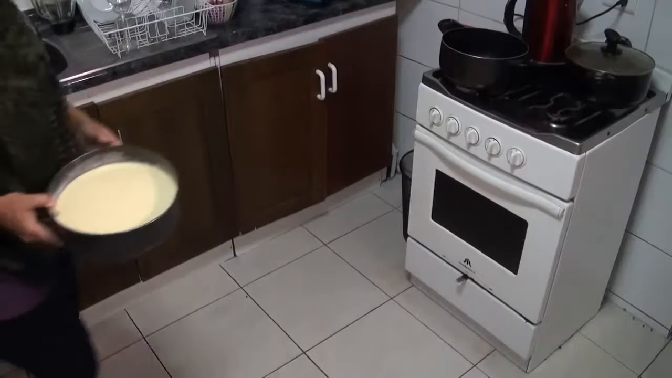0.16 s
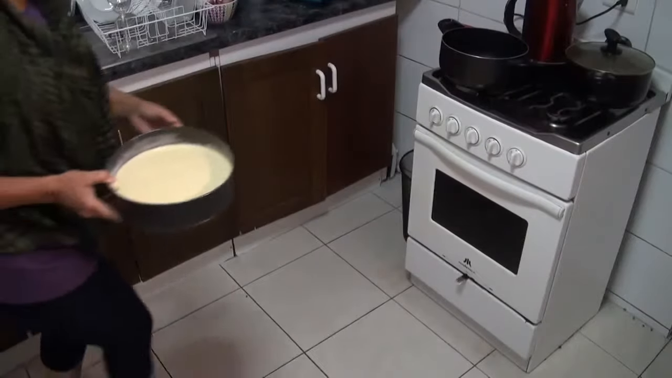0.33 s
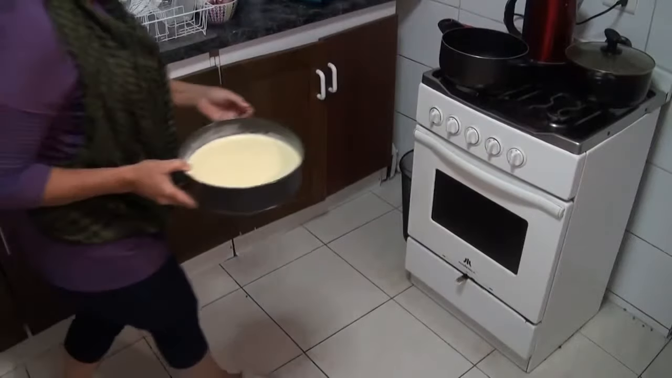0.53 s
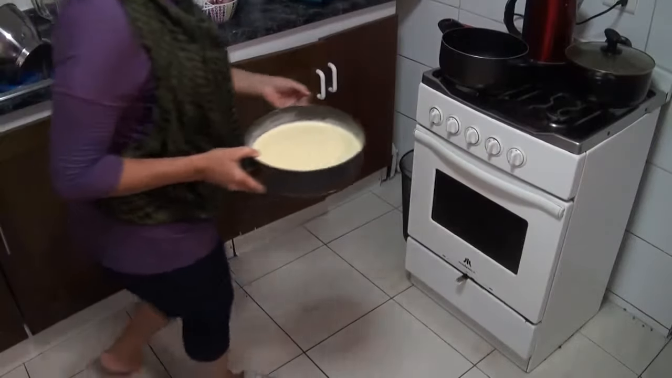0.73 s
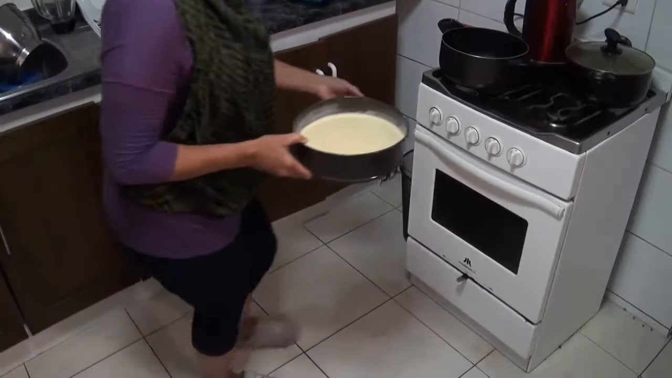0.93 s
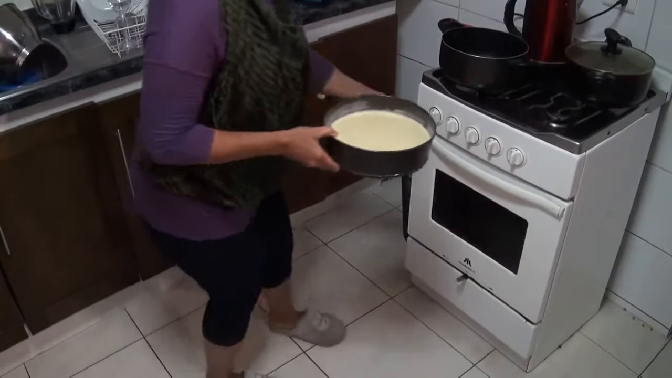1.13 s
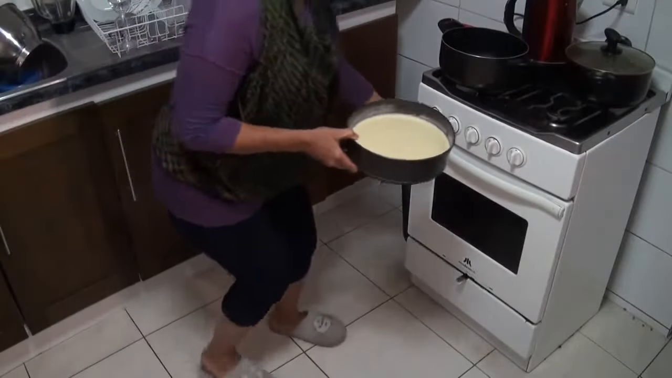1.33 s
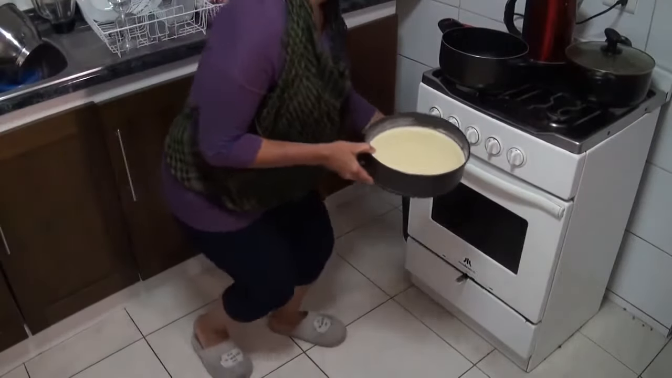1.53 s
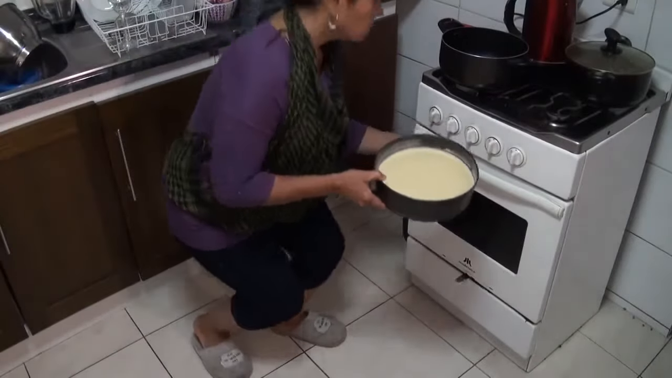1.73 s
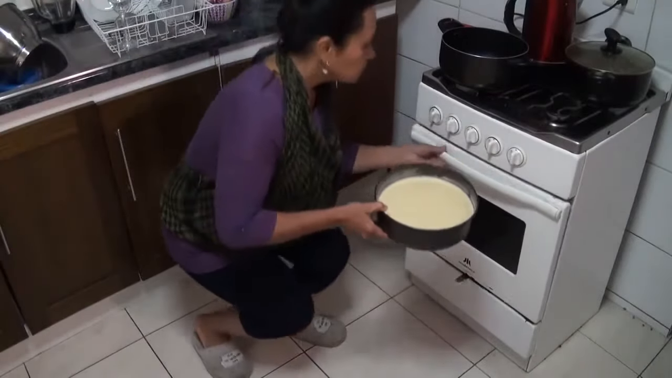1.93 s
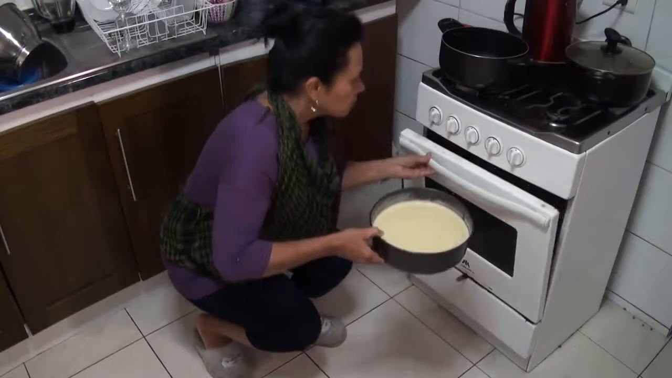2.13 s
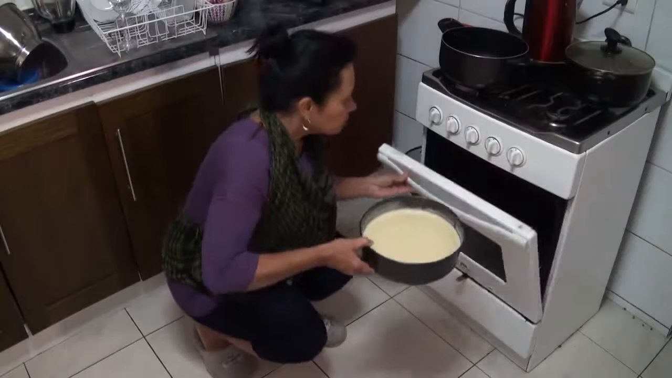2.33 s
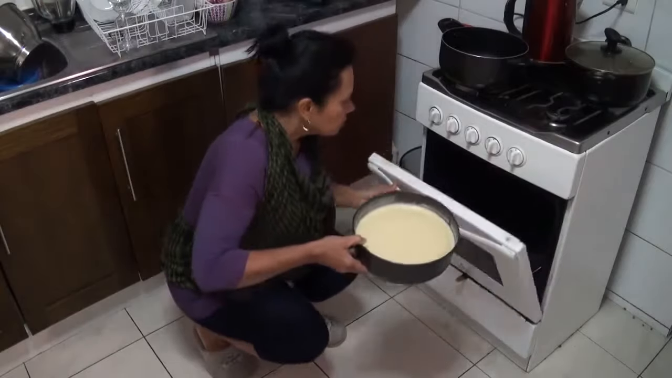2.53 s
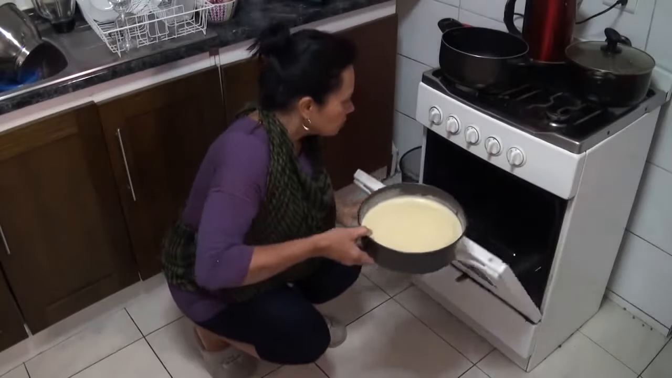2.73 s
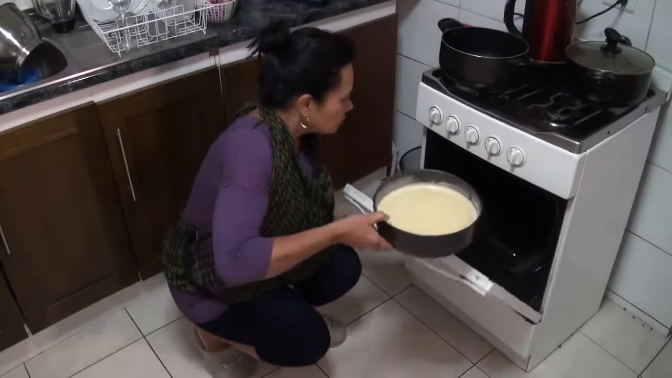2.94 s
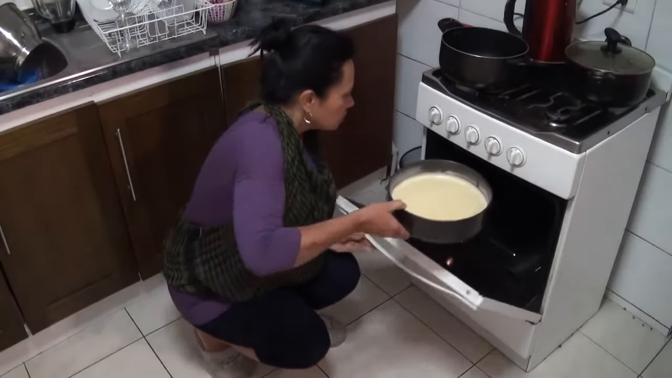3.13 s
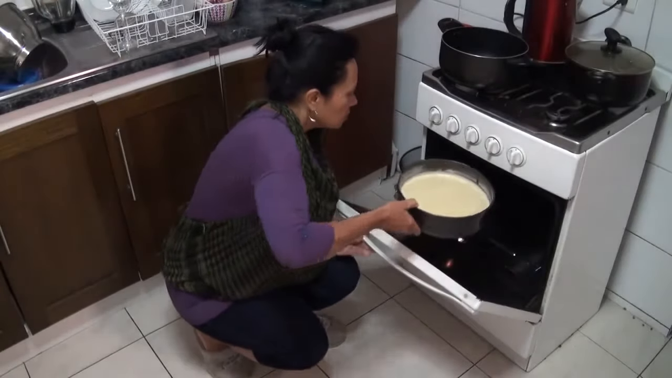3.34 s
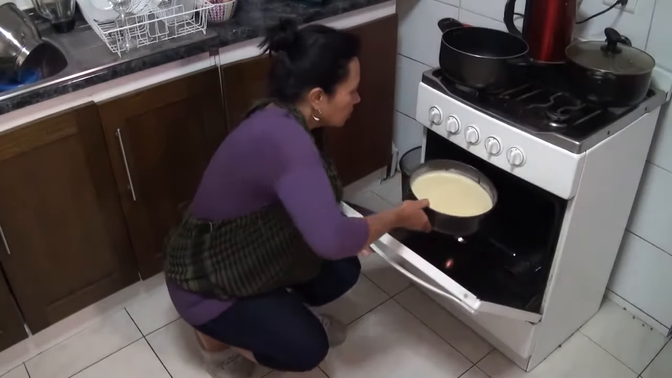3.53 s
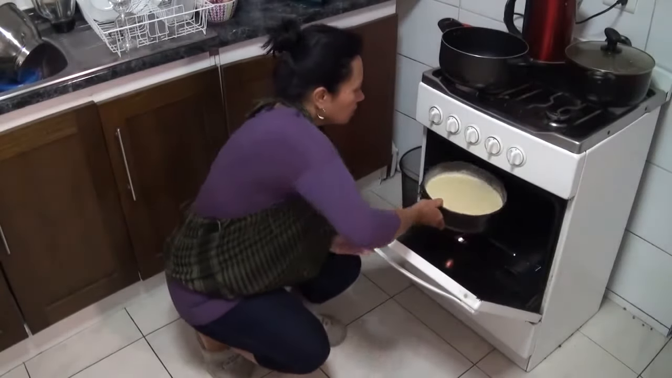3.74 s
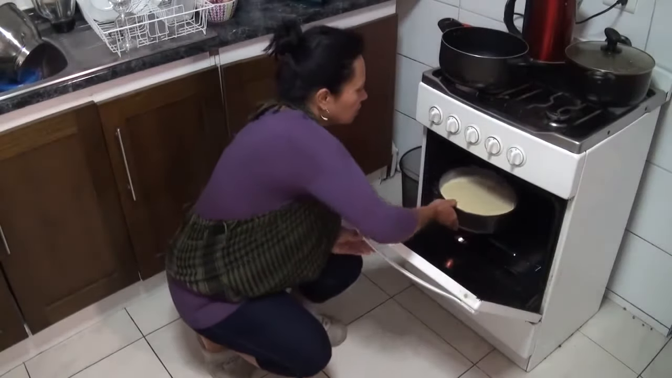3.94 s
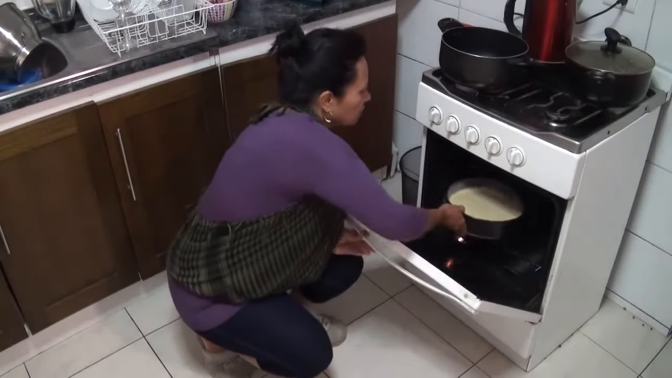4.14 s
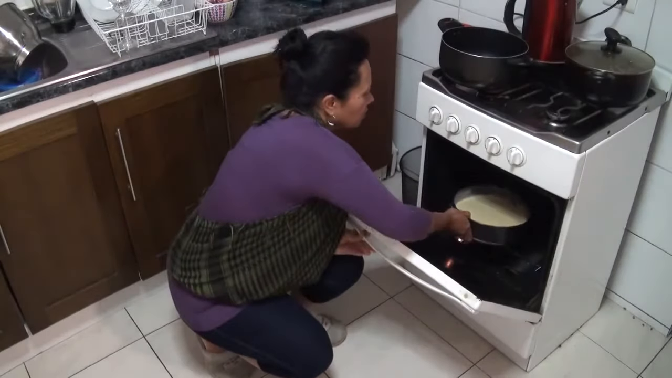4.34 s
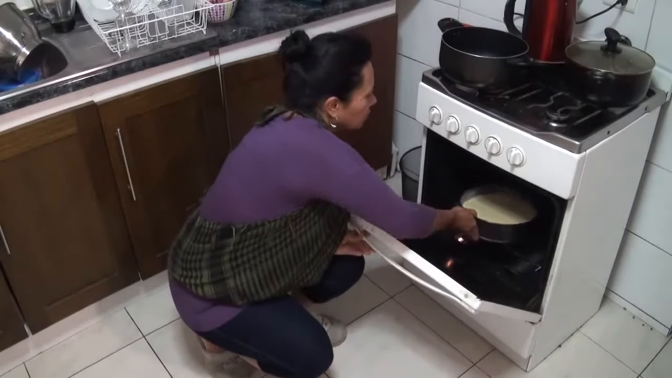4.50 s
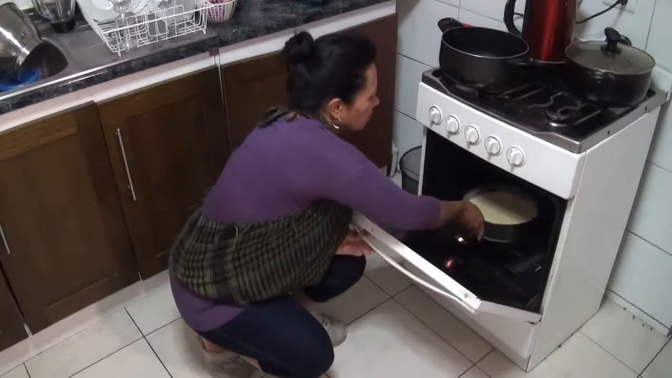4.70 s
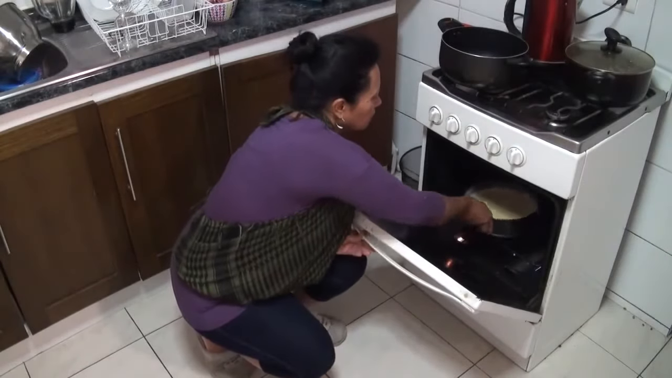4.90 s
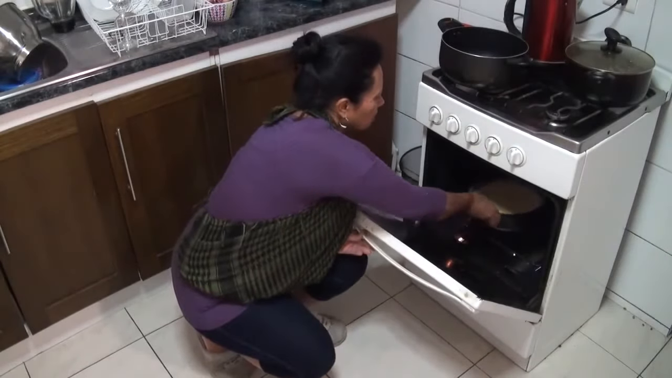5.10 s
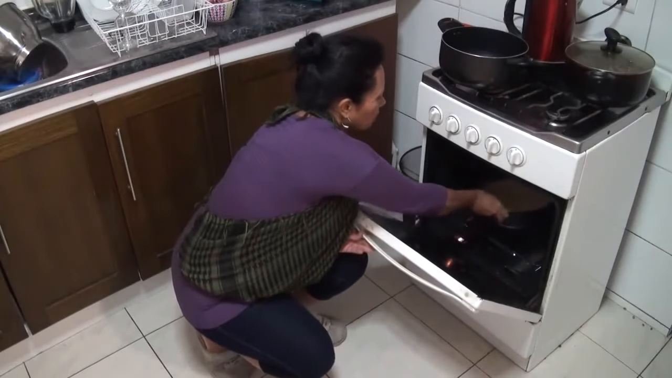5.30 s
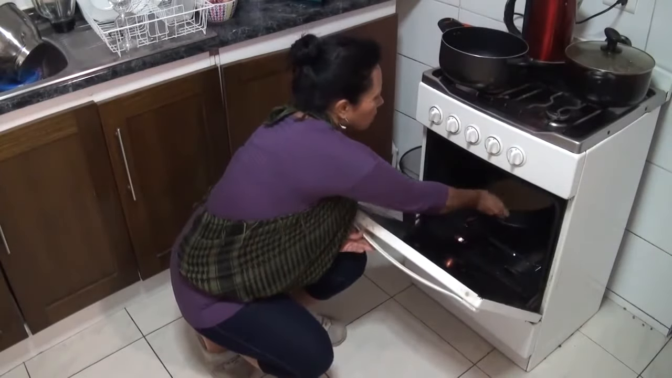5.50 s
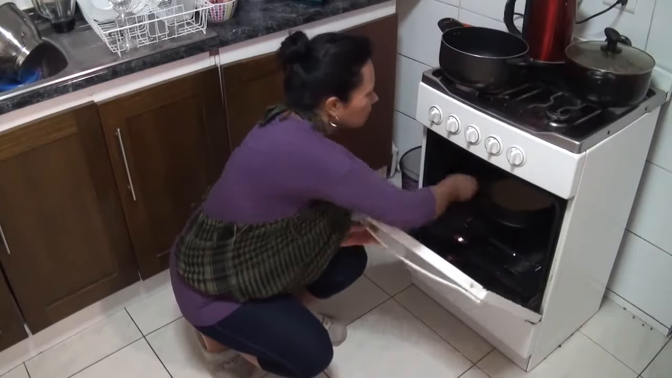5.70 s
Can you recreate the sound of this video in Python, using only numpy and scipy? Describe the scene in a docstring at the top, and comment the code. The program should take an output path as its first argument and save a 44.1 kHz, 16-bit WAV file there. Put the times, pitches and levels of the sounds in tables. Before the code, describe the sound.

Quiet slipper steps and rustling clothes come first, in a hushed kitchen with slightly echoing tiles. Then an oven door opens with a ringing groan and a string of high hinge squeals, the loudest sounds here. A metal cake pan is set on the oven rack with a sharp clank and pushed in with several gritty scrapes, until a last jolt booms softly in the oven walls. Everything is heard from straight ahead.

```python
"""Slippers shuffle across a tiled kitchen, clothes swishing, the floor booming softly underneath.
At 2 s the door of a gas oven is pulled down: the sheet metal rumbles while the dry hinges stick
and slip in loud squeals and a groan that sets the door spring ringing. At 4.4 s a metal cake pan
lands on the wire rack, clatters over it and is scraped to the back, where a last jolt booms in
the oven's walls. A limiter holds the loud squeals down."""
import sys
import numpy as np
from scipy import signal
from scipy.fft import rfft, irfft, next_fast_len
from scipy.io import wavfile
from scipy.ndimage import uniform_filter1d, minimum_filter1d, map_coordinates

SR = 44100
rng = np.random.default_rng(int(sys.argv[2]) if len(sys.argv) > 2 else 0)


def digitize_waveform(pressure):
    """Quantize a signal to 16-bit integers and store it at the path in sys.argv[1].

    Rows of a 2-D input are taken as channels; values are limited to [-1, 1].
    """
    field = np.atleast_2d(pressure).T
    bounded = np.clip(field, -1, 1)
    quanta = np.round(bounded * 32767).astype(np.int16)
    wavfile.write(sys.argv[1], SR, quanta)


N = 258381
TIME = np.arange(N) / SR

# Table levels are relative; each layer sets its own gain. A length runs from onset to release.
# the kitchen's hush: f/Hz, level/dB
HUSH_EQ = [(20, -16), (50, -11), (100, -24), (140, -13), (175, -28), (270, -23.5), (420, -31),
           (2000, -38.5), (8900, -45), (16000, -46.5)]
# reverb decay off the tiles: f/Hz, t60/s
ROOM_DECAY = [(100, .5), (900, .36), (4300, .37), (16000, .26)]

# dull floor booms under the steps: t/s, f/Hz, level/dB, rise/s, t60/s
FLOOR_BOOMS = [(0, 273, -46, 0.027, 1.4), (.031, 105.8, -42, 0.074, 1.2), (.19, 109, -33, .062, .5),
               (0.622, 45.15, -29.5, 0.026, 1.2), (0.849, 46.2, -40, 0.079, 2),
               (1.245, 290, -39.5, 0.0032, 0.18)]
# strides and turns of the body: t/s, length/s, shuffle level/dB, swish level/dB
STRIDES = [(0.013, 0.15, -37, -44), (0.463, 0.25, -42.5, -51.5), (0.703, 0.1, -40.5, -42.5),
           (1.142, 0.12, -46, -52), (1.272, 0.097, -42.5, -44.5), (1.384, 0.044, -41.5, -42.5),
           (1.55, 0.1, -47, -51), (1.691, 0.19, -55, -48.5), (1.86, 0.25, -47.5, -48.5)]
# slipper taps and handling ticks: t/s, level/dB, centre f/Hz, decay time/s
TICKS = [(0.467, -31.5, 2250, 0.038), (0.654, -28, 1260, 0.023), (1.124, -36.5, 4120, 0.0058),
         (1.244, -24.5, 2740, 0.007), (1.2477, -23, 2650, 0.0029), (1.417, -30, 2350, 0.014),
         (1.569, -33, 1960, 0.008), (1.862, -35.5, 3900, 0.011), (4.053, -49, 2520, 0.044),
         (4.093, -44, 7960, 0.013)]
# tone of soles on tile, swishing clothes and the rumbling floor: f/Hz, level/dB
SHUFFLE_EQ = [(100, -28), (250, 0.5), (360, -6.5), (500, -2), (1570, -2), (3500, -4), (6000, -11),
              (9000, -49)]
SWISH_EQ = [(1760, -30.5), (3000, -9), (7500, -7), (8700, -16), (14000, -16.5), (16000, -30)]
FOOTFALL_EQ = [(25, 6.5), (55, 0), (90, -12.5), (140, -6), (220, -24), (500, -50)]

# modes of the oven's sheet-metal walls: f/Hz, level/dB, t60/s
WALL_MODES = [(182.2, -9.5, .55), (254.6, -0.5, 0.55), (347, 1, 0.13), (414, -12, 0.333)]
# jolts from door and pan: t/s, level/dB, rise/s
WALL_JOLTS = [(2.665, -35, 0.046), (3.289, -43, .02), (5.746, -28, 0.011)]
# wall drone under the sliding pan: t/s, lowest mode level/dB, second mode level/dB
WALL_DRONE = [(4.46, -46, -59), (4.474, -42, -48), (4.682, -50, -39), (4.78, -38.5, -31), (4.934, -48, -52),
              (5.24, -42, -26.5), (5.28, -30, -41), (5.372, -50.5, -42), (5.496, -30, -35),
              (5.592, -42, -45), (5.622, -32, -46), (5.73, -48, -42)]

# the door's long swing and early judder: t/s, attack/s, length/s, t60/s, rumble/dB, rubbing/dB
DOOR_MOVES = [(2.049, 0.18, 0.93, 2.4, -40.5, -46), (2.324, .08, 0.098, 0.25, -28.5, -33.5)]
# tone of the door panels and the rubbing hinge arms: f/Hz, level/dB
PANEL_EQ = [(35, -7.5), (70, -1), (120, -5.5), (240, -7), (350, -4), (530, -11.5), (700, -20.5),
            (1200, -46)]
RUBBING_EQ = [(400, -20), (700, -3), (930, 6), (1200, -4.5), (2700, -8.5), (4000, -4), (7000, -14),
              (10000, -23.5), (16000, -31.5)]

# ringing modes of pan and rack: f/Hz, level/dB, t60/s
PAN_MODES = [(425, 0, 0.36), (527, 1.5, 1), (653, 2, 0.63), (1133, -3.5, 0.47), (1389, -30, 0.26),
             (1420, -2, 1), (1850, -11, 0.42), (1982, 9.5, 0.2), (2283, -6, 0.36), (2770, 6, 0.076),
             (2670, 6, 0.27), (3230, -22, 0.091), (3470, -3, 0.15), (4380, -6, 0.26), (5870, 1, 0.088)]
# pushes that slide the pan: t/s, length/s, grind level/dB, grit level/dB
PAN_PUSHES = [(4.5, 0.15, -35.5, -41), (4.635, 0.042, -25, -36.5), (4.862, .22, -26, -32.5),
              (5.107, 0.43, -30, -33.5), (5.522, 0.044, -29.5, -38.5)]
# blows of the pan on the rack: t/s, level/dB, rattle decay time/s, low-pass f/Hz
PAN_KNOCKS = [(4.442, -22, 0.0071, 14000), (4.452, -26, 0.092, 3000), (4.751, -30, 0.011, 9000),
              (4.7548, -12, 0.0056, 9200), (4.767, -13, 0.038, 2570), (5.754, -23.5, 0.024, 340)]
# tone of the scrape's body, its gritty top and the rack's clank: f/Hz, level/dB
GRIND_EQ = [(150, -17.5), (260, -2.5), (530, -0.5), (900, -5.5), (1400, -4.5), (1900, -3), (3000, -7.5),
            (6000, -30), (9000, -53)]
GRIT_EQ = [(2350, -36), (4000, -2), (5070, -8), (5900, -6.5), (7500, -6.5), (8850, -17.5), (12800, -18),
           (16000, -23)]
CLANK_EQ = [(60, -50), (110, -16.5), (244, -6.5), (930, -4.5), (2500, -4), (3700, -7.5), (7700, -11),
            (8700, -21.5), (13000, -19), (16000, -22)]

# low, groaning hinge slips: t/s, length/s, start f/Hz, end f/Hz, level/dB
GROANS = [(2.271, 0.063, 847, 869, -26.5), (2.317, 0.093, 840.5, 839.2, -8.5),
          (2.433, .094, 942, 951.5, -3.5)]
# high, squealing hinge slips: t/s, length/s, start f/Hz, end f/Hz, level/dB, second harmonic/dB
SQUEALS = [(2.21, .062, 4200, 4290, -7.5, -23), (2.258, .07, 4390, 4437, -4, -25),
           (2.369, .048, 4416, 4440, -14.5, -26.5), (2.678, .018, 5190, 5210, -33, -37.5),
           (2.739, .022, 5165, 5165, -28, -29), (2.813, .026, 3471, 3480, -5, -22),
           (2.835, .062, 3588, 3527, -15, -16.5), (2.86, .038, 3860, 3764, -11.5, -19.5),
           (3.008, .018, 4130, 4150, -17, -20), (3.02, .036, 3973, 4105, -6, -1),
           (3.06, .03, 4270, 4220, -8, -12.5), (3.079, .026, 3870, 3998, -4.5, -6.5),
           (3.102, .058, 4335, 4308, -1, -18), (3.157, .094, 4360, 4573, -7, -13.5),
           (3.256, 0.074, 4776, 4768, -9, -16.5)]


def amp(db):
    """Decibels to gain."""
    return 10 ** (np.asarray(db) / 20)


def unit(x):
    """Scales to rms 1."""
    return x / np.sqrt(np.mean(x ** 2) + 1e-20)


def match_energy(x, reference):
    """Scales x to the energy of the reference."""
    return x * np.linalg.norm(reference) / np.linalg.norm(x)


def curve_at(points, hz):
    """Reads a curve on a log-frequency axis."""
    point_hz, values = np.transpose(points)
    return np.interp(np.log(hz + 1), np.log(point_hz + 1), values)


def add(mix, start, sound):
    """Mixes a sound in at a start time in seconds."""
    part = mix[max(round(start * SR), 0):][:len(sound)]
    part += sound[:len(part)]


def colour(x, eq):
    """Shapes a signal with an EQ curve, at rms 1."""
    size = next_fast_len(len(x))
    gain = amp(curve_at(eq, np.fft.rfftfreq(size, 1 / SR)))
    return unit(irfft(rfft(x, size) * gain, size)[:len(x)])


def noise(eq, size=N):
    """Noise shaped by an EQ curve, at rms 1."""
    return colour(rng.standard_normal(size), eq)


def drift(size, hz):
    """Bounded random modulation that turns about hz times a second."""
    points = np.clip(rng.standard_normal(4096), -2, 2)
    return np.interp(np.arange(size) * hz / SR, np.arange(4096), points)


def envelope(t, attack, length, t60):
    """Swells over the attack, holds until length, then dies away."""
    swell = np.sin(np.pi / 2 * np.clip(t / attack, 0, 1)) ** 2
    return swell * amp(-60 * np.maximum(t - length, 0) / t60)


def strokes(rows, layer, attack, t60):
    """Gain curve of overlapping strokes, adding in power; layer picks the level column."""
    gains = (amp(levels[layer]) * envelope(TIME - start, attack, length, t60)
             for start, length, *levels in rows)
    return np.sqrt(sum(gain ** 2 for gain in gains))


def friction(per_s, spread_db, hiss):
    """Tiny slips of uneven size over a smooth hiss."""
    slips = (rng.random(N) < per_s / SR) * amp(spread_db * np.minimum(rng.exponential(1, N), 4))
    crackle = unit(slips * rng.choice([-1, 1], N))
    return unit(crackle + hiss * rng.standard_normal(N))


def ring(x, modes):
    """Rings a set of damped modes; keeps the energy."""
    t = np.arange(SR) / SR
    response = sum(amp(db - 60 * t / t60) / np.sqrt(t60) * np.sin(2 * np.pi * (hz * t + rng.random()))
                   for hz, db, t60 in modes)
    return match_energy(signal.fftconvolve(x, response)[:N], x)


def low_mode(hz, size, waver=0.019):
    """A low, slightly wavering tone at rms 1."""
    pitch = hz * (1 + waver * drift(size, 50))
    return unit(np.sin(2 * np.pi * np.cumsum(pitch) / SR))


def boom(hz, db, rise, t60):
    """A single low mode that swells and dies away."""
    t = np.arange(2 * SR) / SR
    return amp(db) * low_mode(hz, len(t)) * envelope(t, rise, rise, t60)


def kitchen(x, direct_db, size=30000, predelay_s=.003):
    """Direct sound plus dense echoes off the tiles, each band dying at its own speed."""
    taps = rng.standard_normal(size) * (rng.random(size) < .12) * (np.arange(size) > predelay_s * SR)
    hz, t, bands = signal.stft(taps, SR, nperseg=256)
    decay = amp(-60 * t / curve_at(ROOM_DECAY, hz)[:, None])
    response = signal.istft(bands * decay, SR, nperseg=256)[1]
    response /= np.linalg.norm(response)
    response[0] += amp(direct_db)
    return match_energy(signal.oaconvolve(x, response)[:N], x)


def room_tone(db):
    """The kitchen's steady, bass-heavy hush."""
    return amp(db) * noise(HUSH_EQ)


def floor():
    """The floor booms under the steps."""
    out = np.zeros(N)
    for start, *mode in FLOOR_BOOMS:
        add(out, start, boom(*mode))
    return out


def ticks():
    """Slipper taps and small handling contacts, each a short burst of noise."""
    out, t = np.zeros(N), np.arange(SR // 4) / SR
    for start, db, hz, decay in TICKS:
        eq = [(hz / 12, -7), (hz * .6, -7), (hz, 0), (hz * 1.25, -1), (hz * 1.8, -12), (hz * 5, -42)]
        add(out, start, amp(db) * noise(eq, len(t)) * np.exp(-t / decay))
    return kitchen(out, direct_db=4.5)


def walk(attack=0.066, t60=.42):
    """Slippers shuffle on tile and clothes swish, over a faint bed of rustle and floor rumble."""
    bed = amp(-53) * envelope(TIME + attack, attack, length=1.8, t60=t60)
    shuffle = amp(2.04) * np.hypot(bed, strokes(STRIDES, 0, attack, t60))
    swish = amp(-0.5) * np.hypot(amp(-5) * bed, strokes(STRIDES, 1, attack, t60))
    slippers = shuffle * colour(friction(per_s=1500, spread_db=2.6, hiss=1.0), SHUFFLE_EQ)
    clothes = swish * colour(friction(per_s=810, spread_db=1.7, hiss=0.48), SWISH_EQ)
    rumble = amp(8) * bed * noise(FOOTFALL_EQ)
    return kitchen(slippers + clothes, direct_db=5.5) + rumble


def oven_walls(drone_trim_db=-2):
    """Jolts ring all the wall modes; the sliding pan keeps the lowest two droning."""
    out = np.zeros(N)
    for start, jolt_db, rise in WALL_JOLTS:
        for hz, db, t60 in WALL_MODES:
            add(out, start, boom(hz, jolt_db + db, rise, t60))
    times, *mode_levels = np.transpose(WALL_DRONE)
    sliding = envelope(TIME - times[0], attack=0.06, length=times[-1] - times[0], t60=0.51)
    for (hz, _, _), levels in zip(WALL_MODES, mode_levels):
        fader = amp(drone_trim_db + np.interp(TIME, times, levels))
        out += sliding * fader * low_mode(hz, N, waver=0.027)
    return out


def door():
    """The hinge arms rub and shake the door's panels."""
    rumble, rubbing = np.zeros((2, N))
    for start, attack, length, t60, rumble_db, rubbing_db in DOOR_MOVES:
        speed = envelope(TIME - start, attack, length, t60)
        rumble += amp(rumble_db) * speed
        rubbing += amp(rubbing_db) * speed
    panels = rumble * colour(friction(per_s=270, spread_db=2.6, hiss=1.0), PANEL_EQ)
    arms = rubbing * colour(friction(per_s=900, spread_db=1.5, hiss=0.4), RUBBING_EQ)
    return kitchen(panels + amp(5.5) * arms, direct_db=6.5)


def wander(x, depth_db, patch_hz=130, patch_s=0.098):
    """The point of contact travels, so resonances swell and fade in turn."""
    hz, t, bands = signal.stft(x, SR, nperseg=1024, noverlap=768)
    grid = np.meshgrid(hz / patch_hz, t / patch_s, indexing="ij")
    patches = map_coordinates(rng.standard_normal((400, 200)), grid, order=1, mode="wrap")
    out = signal.istft(bands * amp(depth_db * patches), SR, nperseg=1024, noverlap=768)[1][:N]
    return match_energy(out, x)


def pan_slide(attack=0.06, t60_scale=0.1):
    """The pan's base grinds over the wires, ringing the metal above a low rumble."""
    grind_gain = strokes(PAN_PUSHES, 0, attack, t60=0.95)
    grit_gain = strokes(PAN_PUSHES, 1, attack, t60=0.51)
    slips = friction(per_s=800, spread_db=2.5, hiss=0.73)
    damped_modes = [(hz, db, t60 * t60_scale) for hz, db, t60 in PAN_MODES]  # muted by hand and wires
    grind = amp(0.24) * grind_gain * colour(slips, GRIND_EQ)
    ringing = amp(-3) * ring(grind_gain * slips, damped_modes)
    grit = grit_gain * colour(friction(per_s=1200, spread_db=0.94, hiss=0.98), GRIT_EQ)
    rumble = grind_gain * noise([(30, -14), (70, -0.5), (190, -0.5), (330, -1.5), (900, -53)])
    scrape = wander(grind + ringing + grit, depth_db=3.5)
    return kitchen(scrape, direct_db=5) + amp(-15) * rumble


def pan_knocks():
    """Each blow makes the loose rack chatter briefly and rings the metal."""
    blows, t = np.zeros(N), np.arange(SR // 3) / SR
    for start, db, decay, corner_hz in PAN_KNOCKS:
        lowpass = signal.butter(2, corner_hz, fs=SR)
        chatter = unit(signal.lfilter(*lowpass, noise(CLANK_EQ, len(t))))
        crack = np.diff(chatter, prepend=0) * np.exp(-t / 0.013)  # the first contact is the brightest
        add(blows, start, amp(db) * (chatter + 1.38 * crack) * np.exp(-t / decay))
    ringing = amp(-19) * ring(blows, PAN_MODES)
    return amp(2) * kitchen(blows + ringing, direct_db=0)


def stick_slip(length, start_hz, end_hz, second_db, attack, t60, fall_db, jitter, rasp_db):
    """Steel catches and slips on steel: an unsteady gliding tone whose harmonics flicker."""
    flicker_hz, flutter_db, dull_hz = 330, 1.64, 14500
    t = np.arange(SR // 3) / SR
    hz = np.interp(t, [0, length], [start_hz, end_hz]) * (1 + jitter * drift(len(t), flicker_hz))
    phase = 2 * np.pi * np.cumsum(hz) / SR
    tone = np.sin(phase)
    for k in range(2, 5):
        rolloff = 1 / (1 + (k * hz / dull_hz) ** 10)  # dulls the harmonics above about 14.5 kHz
        harmonic_db = second_db - fall_db * (k - 2) + rasp_db * drift(len(t), flicker_hz)
        tone += rolloff * amp(harmonic_db) * np.sin(k * phase)
    flutter = amp(flutter_db * drift(len(t), flicker_hz))
    return unit(tone) * flutter * envelope(t, attack, length, t60)


def hinges(pulse_depth=0.029, pulse_knee_db=-35, spring_hz=836, spring_t60=1.3, spring_db=-27.5):
    """Each squeal beats against its own echoes; the groan pulses the squeal and rings the spring."""
    squeals, groans = np.zeros((2, N))
    for start, length, start_hz, end_hz, db, second_db in SQUEALS:
        tone = stick_slip(length, start_hz, end_hz, second_db,
                          attack=.019, t60=0.071, fall_db=9, jitter=0.0059, rasp_db=4.5)
        add(squeals, start, amp(db) * kitchen(tone, direct_db=4))
    for start, length, start_hz, end_hz, db in GROANS:
        tone = stick_slip(length, start_hz, end_hz, second_db=-31,
                          attack=.044, t60=.15, fall_db=6, jitter=0.0073, rasp_db=9.5)
        add(groans, start, amp(db) * kitchen(tone, direct_db=10.5))
    pulse = 1 + pulse_depth * np.tanh(groans / amp(pulse_knee_db))
    creak = groans + squeals * pulse
    spring = amp(spring_db) * ring(creak, [(spring_hz, 0, spring_t60)])
    return creak + spring


def scene():
    """All the action sits dead centre; only the room tone has a little stereo width."""
    hush, side = room_tone(db=-47), room_tone(db=-63)
    footsteps = floor() + ticks() + walk()
    oven = oven_walls() + door() + pan_slide() + pan_knocks() + hinges()
    mid = hush + footsteps + oven
    return np.array([mid + side, mid - side])


def record(dry, ceiling_db=-2.0, release_db_per_s=90, drive=0.3, lopsided=.04, cutoff_hz=15850):
    """A peak limiter with fast attack and slow release, mild lopsided overload, then a low-pass."""
    over_db = np.maximum(20 * np.log10(abs(dry).max(0) + 1e-9) - ceiling_db, 0)
    release_db = release_db_per_s * TIME
    reduction_db = np.maximum.accumulate(over_db + release_db) - release_db
    gain_db = uniform_filter1d(minimum_filter1d(-reduction_db, size=100), size=100)
    limited = dry * amp(gain_db)
    # a faint squared term makes the overload lopsided
    side_tones = signal.lfilter(*signal.butter(2, 40, "high", fs=SR), limited ** 2)
    saturated = np.tanh(drive * limited) / drive + lopsided * side_tones
    lowpass = signal.firwin(511, cutoff_hz, window=("kaiser", 9), fs=SR)
    return signal.oaconvolve(saturated, lowpass[None], "same")


dry = scene()
out = record(dry)
digitize_waveform(out)
```